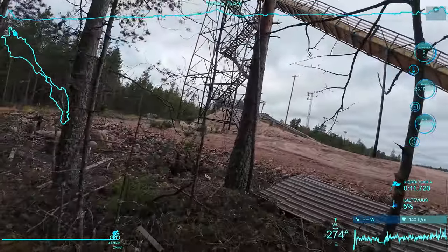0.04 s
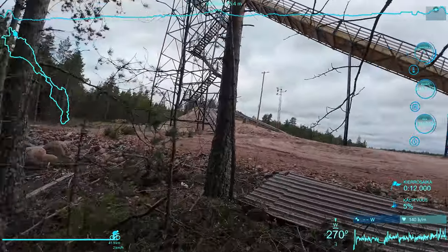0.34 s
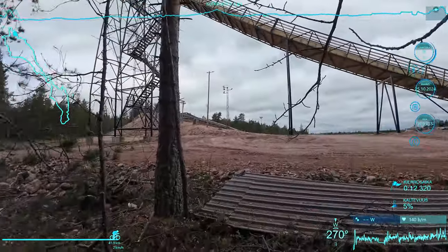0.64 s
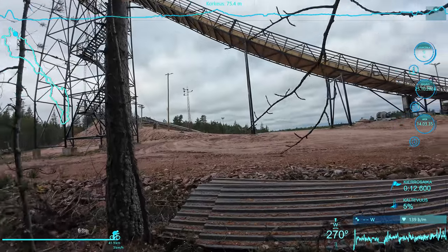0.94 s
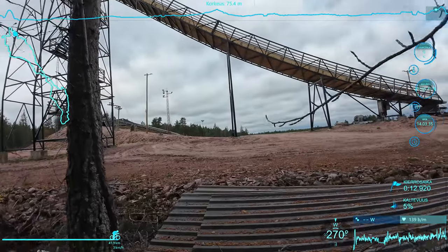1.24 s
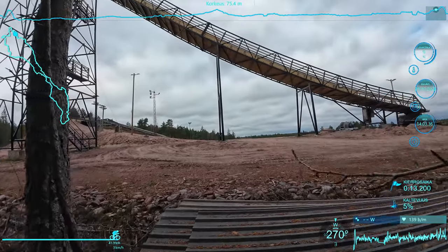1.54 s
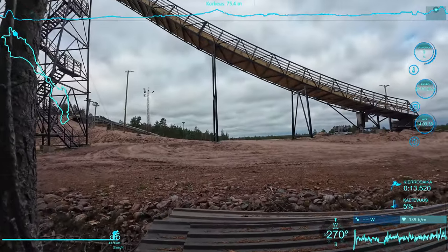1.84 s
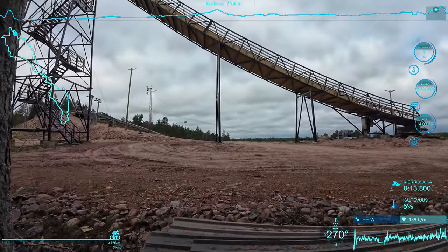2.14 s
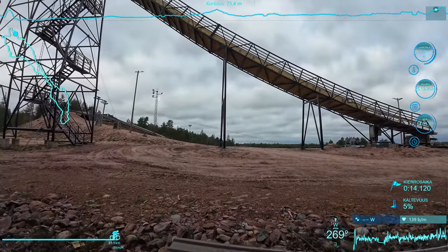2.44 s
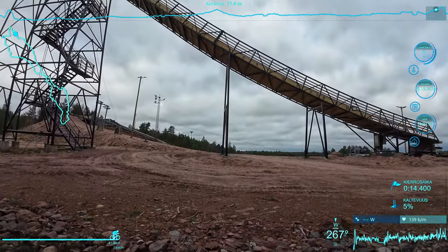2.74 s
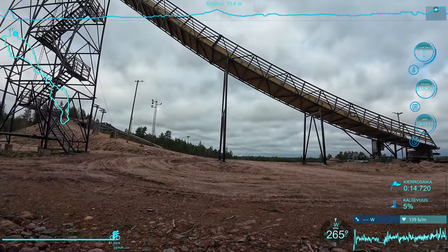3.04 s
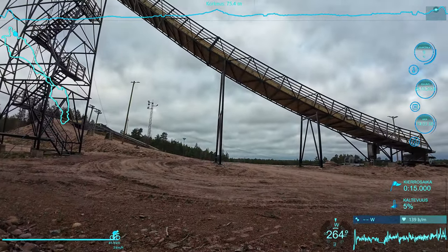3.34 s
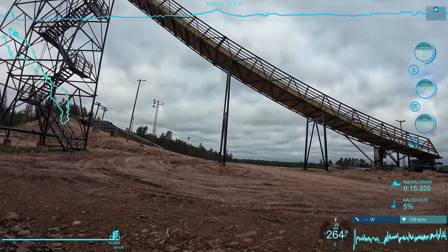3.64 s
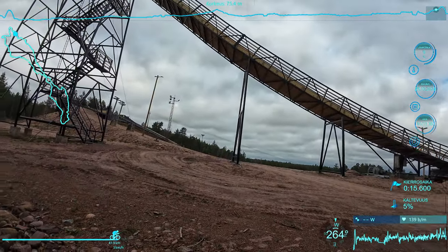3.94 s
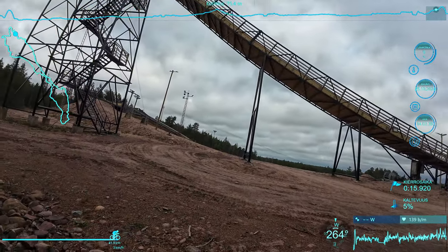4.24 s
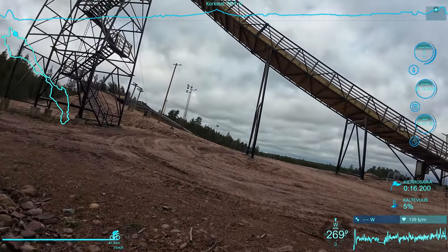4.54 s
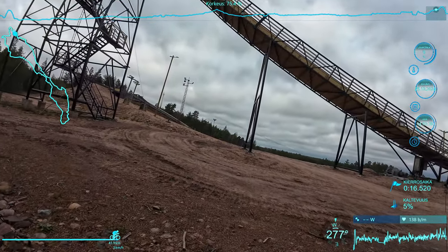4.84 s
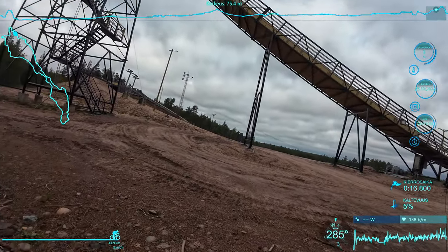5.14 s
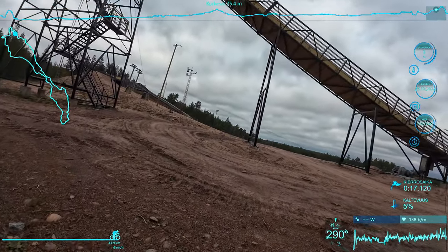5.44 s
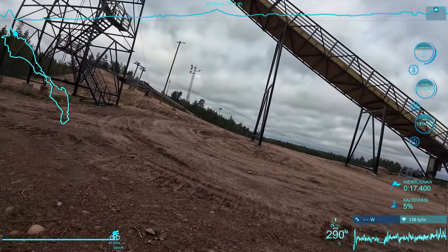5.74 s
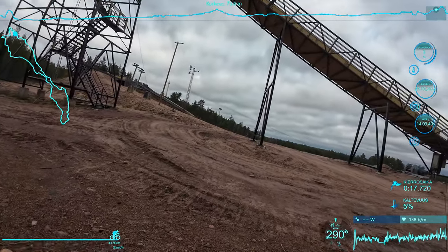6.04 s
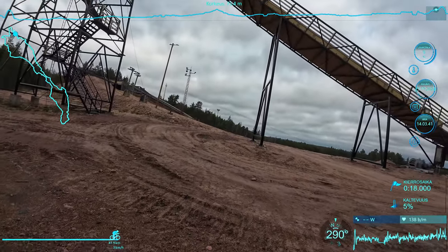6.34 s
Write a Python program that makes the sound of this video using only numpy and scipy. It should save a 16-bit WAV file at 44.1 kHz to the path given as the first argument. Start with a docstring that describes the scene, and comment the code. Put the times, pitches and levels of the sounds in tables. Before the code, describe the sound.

A mountain bike rolls slowly over sandy gravel outdoors, heard close from a microphone riding along, with low wind rumble throughout. For the first 2.5 seconds the tyres crackle and hiss softly, pebbles click, single stones snap away with small pings, and a gust puffs at about 1.3 seconds. At 2.5 seconds a sharp jolt rings the frame, and coarser crunching and chattering loose parts follow until just after 3 seconds. A quieter stretch of grit and stone ticks comes next, with one very faint, brief brake squeak near 3.3 seconds. From 4.4 to 5.2 seconds a quick run of bumps brings rattles, metallic clanks and hollow knocks over louder crunching. Wind buffets harder from about 4.7 seconds, with another hollow knock at 5.5. The gravel keeps crunching, the strongest gusts arrive after 6 seconds, and a stone cracks sharply around 6.3 seconds.

```python
"""A mountain bike rolls slowly onto rough, sandy gravel, heard from a camera that rides along.
Under the tyres the ground crunches and hisses, pebbles clink and single stones snap away.
Bumps make loose parts rattle and the frame ring, and the brake squeaks faintly once.
Wind rumbles and puffs on the camera's two microphone openings."""
import sys
import numpy as np
from scipy import signal
from scipy.fft import rfft, irfft, next_fast_len
from scipy.io import wavfile
from scipy.ndimage import uniform_filter1d, map_coordinates

SR = 44100
rng = np.random.default_rng(int(sys.argv[2]) if len(sys.argv) > 2 else 0)


def materialize(psi):
    """Save the field psi as 16-bit PCM at rate SR to the path in sys.argv[1].

    A 1-D psi becomes a single channel; in a 2-D psi each row is a channel.
    """
    bounded = np.clip(np.atleast_2d(psi).T, -1, 1)
    quanta = np.round(bounded * 32767).astype(np.int16)
    wavfile.write(sys.argv[1], SR, quanta)


N = 281659

# The ground under the tyres, rocky from 2.5 s and 4.5 s: t/s, crunch/dB, grit/dB, sand hiss/dB
GROUND = [(0.0, -55.5, -58, -70.5), (0.168, -58.5, -55, -60.5), (0.3, -50, -54, -58),
          (0.53, -50, -58.5, -64), (0.66, -56.5, -53.5, -58.5), (0.8, -49.5, -57, -62),
          (0.86, -53, -55, -61.5), (1.03, -54.5, -59, -66), (1.3, -50.5, -53, -60.5),
          (1.85, -54.5, -56, -65), (1.95, -56, -64.5, -67.5), (2.44, -51.5, -66, -70),
          (2.49, -35, -51.5, -63), (2.66, -40, -60, -89), (2.77, -34, -58, -69), (3.1, -40.5, -51.5, -61),
          (3.2, -50.5, -60, -73), (3.33, -55, -64.5, -79), (3.5, -50, -55, -65), (3.62, -54.5, -62.5, -71),
          (3.9, -54, -56.5, -65.5), (4.18, -51.5, -51, -67), (4.29, -56.5, -58, -73), (4.41, -51, -59, -67),
          (4.47, -40.5, -52.5, -76), (5.12, -32.5, -49, -63), (5.24, -43.5, -56, -67),
          (5.6, -46.5, -58.5, -76), (5.97, -38.5, -47.5, -57.5), (6.39, -39.5, -45.5, -61.5)]
# The tread scrubs through loose patches: t/s, grit level/dB, half length/s
SCRUBS = [(0.23, -53.5, 0.066), (0.39, -54.5, 0.14), (0.655, -54, 0.027), (0.79, -53.5, 0.045),
          (2.03, -51.5, 0.043), (2.18, -51, 0.082), (2.32, -55.5, 0.051), (2.71, -49, 0.14),
          (3.448, -49.5, 0.038), (3.99, -55, 0.013), (4.43, -50, 0.059), (4.89, -47, 0.087),
          (5.05, -42.5, 0.011), (5.68, -50.5, 0.072)]
# The tone of coarse gravel, fine grit, sand and a hard hit: f/Hz, level/dB
CRUNCH_TONE = [(60, 0.5), (150, 3.5), (330, 2), (700, -1.5), (1150, -5.5), (1800, -13), (2600, -21),
               (5000, -60), (12000, -79)]
GRIT_TONE = [(300, -61.5), (1000, 9.5), (2000, 3.5), (3200, 3), (4600, -0.5), (5800, -5), (7200, -12),
             (15000, -28.5)]
SAND_TONE = [(1500, -25), (4500, -12), (6200, 1), (7100, -7), (8100, 3), (9000, -2), (10200, 2),
             (11800, -4.5), (13300, 3.5), (14500, -6), (16000, -9)]
HIT_TONE = [(100, 1), (400, 4), (1400, -3.5), (3400, -11), (5700, -18), (7000, -23), (8200, -21),
            (11800, -24.5), (13300, -20), (16000, -31)]
# Heaps of pebbles that shift, and at 2.852 s a low rumble of the frame over rocky ground: t/s, level/dB, half
# length/s, typical f/Hz, number of clinks
PEBBLE_HEAPS = [(1.349, -58, 0.089, 3000, 14), (1.77, -57.5, 0.067, 3300, 16),
                (2.483, -38.5, .014, 3310, 30), (2.654, -48, 0.047, 1070, 60),
                (2.783, -50, 0.023, 2650, 30), (2.852, -46.5, 0.29, 291, 70), (2.976, -72, 0.13, 2950, 70),
                (3.417, -48, .007, 2020, 16), (3.45, -45, 0.0092, 1700, 22), (3.769, -45, .012, 1420, 14),
                (3.885, -47.5, 0.03, 1095, 20), (3.99, -52, 0.018, 1580, 14), (4.179, -48, 0.029, 1400, 24),
                (4.264, -42.5, 0.0058, 1500, 12), (4.481, -28, 0.014, 802, 20), (5.33, -40, 0.037, 860, 40),
                (5.499, -42, 0.011, 2280, 16), (5.681, -49, 0.059, 4480, 80),
                (5.72, -34.5, 0.013, 2320, 24), (6.019, -38.5, .1, 780, 260),
                (6.077, -48.5, 0.14, 1600, 500), (6.348, -22, 0.0058, 2440, 20)]
# Stones that snap away: t/s, crack/dB, brightness/dB per band, ping f/Hz, ping/dB, fade/s
# (A fade is the time a sound takes to drop by 60 dB.)
STONE_SNAPS = [(0.21, -44, 1, 2700, -42, 0.05), (0.224, -39, 1, 2480, -41, 0.037),
               (0.3211, -34.5, 7, 4300, -34, 0.01), (0.782, -53, 19, 5200, -59, .03),
               (1.171, -52, -17, 1370, -34.5, .02), (1.259, -47, -5, 3000, -49, .02),
               (1.36, -45, 5, 3630, -42, .04), (1.475, -38.5, 1, 3360, -39, 0.04),
               (1.542, -33, 5, 2460, -25, 0.03), (1.564, -44, 5, 2550, -35, 0.034),
               (1.625, -42.5, 2, 2360, -37.5, 0.031), (1.706, -40.5, 2, 2670, -38, .035),
               (1.719, -43, -1, 3200, -44, .025), (1.758, -52, 4, 3140, -44, .025),
               (1.814, -54, 1, 2950, -49, 0.023), (1.859, -37.5, -1, 2370, -41, 0.059),
               (1.887, -47, 4, 3520, -45, 0.026), (1.96, -43.5, 3, 1980, -48, 0.016),
               (2.118, -44, 12, 4860, -43, .035), (2.156, -45, 16, 4140, -51, 0.052),
               (2.344, -37.5, -3, 2690, -54, 0.041), (2.713, -31, 16.5, 5540, -25.5, .035),
               (2.7426, -27, 9, 4220, -31, 0.041), (2.767, -37.5, 15, 9400, -35, .035),
               (2.875, -38.5, 9, 6460, -48, .02), (3.261, -55, 12, 10300, -53, 0.033),
               (3.527, -51, 20, 9100, -45, .025), (3.574, -47, -7, 3900, -52, 0.011),
               (3.663, -52.5, -19.5, 1600, -42, .012), (3.711, -50, 13.5, 2630, -54, .015),
               (3.721, -54, 13, 4500, -56, .02), (3.846, -54, 12, 5200, -56, .012),
               (3.917, -56, 18, 9050, -50, 0.018), (4.06, -44, 10, 3530, -47, 0.033),
               (4.146, -45, -1, 1690, -39, 0.016), (4.17, -46, 7, 2200, -49, .02),
               (4.208, -38, 0, 2290, -38.5, .03), (4.255, -39, -4, 1490, -39, 0.032),
               (4.399, -40, 10.5, 1930, -39, .03), (4.48, -37, 16, 3470, -38, .03),
               (4.69, -54, 8, 4500, -56, 0.016), (5.543, -38, 2, 1780, -43, .035),
               (5.568, -47, 4, 4470, -45, 0.022), (6.3344, -29, -10, 1750, -38, 0.0099),
               (6.3405, -39, -9, 2300, -41, 0.011), (6.349, -22.5, -12, 2850, -16.5, 0.0044)]
# The body, crack and splinter bands of an average stone: level/dB each
STONE_BANDS_DB = [-9.5, -3.5, -15.5]
# The notes in a stone's ping: pitch multiplier, level/dB, fade multiplier
STONE_NOTES = [(.75, -7.5, 0.97), (1.001, -6.5, 1.43), (1.6, -4, 0.44), (2.03, -13, 1)]
# Pitches at which the bike likes to ring: f/Hz, width/Hz, level/dB
BIKE_RESONANCES = [(173, 11, -4), (305, 72, -4), (490, 3.1, -1), (670, 72, -14), (848, 160, -9),
                   (1360, 230, -7.5), (1640, 140, -2), (1820, 23, 3.5), (2940, 20, 7), (3660, 490, 10.5),
                   (4430, 500, 5), (6140, 220, 0.5)]
# Bumps: t/s, clatter/dB, thud over clatter/dB, brightness/dB per treble band, ring f/Hz, fade/s
BUMPS = [(2.155, -36.5, 3.5, -0.5, 1440, 0.015), (2.47, -29, 5.5, -1.5, 500, 0.04),
         (2.712, -44, 11, 1, 470, 0.12), (2.747, -35, 7.5, -14, 825, 0.22),
         (2.765, -31.5, -9, 0.5, 696, 0.088), (2.887, -41.5, 2, -5, 1100, 0.21),
         (2.926, -44.5, 11, 1, 840, 0.021), (2.955, -36.5, 2, 0.5, 1050, 0.029),
         (3.097, -38.5, 4, -1, 1210, 0.038), (3.526, -51, 3, 3.5, 710, 0.035),
         (4.376, -35, -6, -2, 1690, 0.023), (4.45, -32.5, -6.5, 0, 890, 0.36),
         (4.524, -40.5, 13.5, -11, 625, 0.012), (4.575, -35, -14, 3.5, 776, 0.013),
         (4.612, -31, -5, -1, 2680, 0.0056), (4.809, -30.5, 1, 0.5, 1050, 0.083),
         (4.835, -33, 9.5, -13, 1040, 0.026), (4.864, -30, 0, 1, 1090, 0.033),
         (4.88, -38, 15, 2.5, 614, 0.028), (4.911, -35, -3, 1.5, 625, 0.029),
         (4.968, -35.5, 14.5, 1, 644, 0.027), (5.017, -41, 15.5, 0.5, 610, 0.073),
         (5.032, -37.5, 12, -3, 760, 0.035), (5.092, -30, -2, -9, 1720, 0.036),
         (5.133, -26.5, 3.5, -5.5, 894, 0.057), (5.227, -45, 5, -1, 580, 0.029),
         (5.369, -40, -8, -0.5, 674, 0.055), (5.431, -39.5, 9, -7, 683, 0.088),
         (5.712, -31, -4.5, -3.5, 1510, 0.08), (6.266, -31.5, -6, -3, 950, 0.051)]
# Hard jolts to the frame: t/s, level/dB, fade multiplier, treble tilt/dB per octave
JOLTS = [(2.4719, -12.5, 0.69, 0), (2.768, -29, 0.6, 9), (2.903, -33, 0.51, -5), (2.956, -28, 0.34, -1),
         (4.5269, -14.5, 0.18, 0), (4.878, -30, 0.74, 3), (4.933, -27, 0.54, -5.5), (4.975, -25, 0.38, 0),
         (5.02, -30, 0.37, -2), (5.036, -27, 0.53, -4), (5.094, -29, 1, 1), (5.137, -26.5, 0.51, 4)]
# The notes of the frame and of the metal parts: f/Hz, level/dB, fade/s
FRAME_NOTES = [(181.4, -7, 0.29), (287, -0.5, 0.069), (495, -11.5, 0.086), (606, -10, 0.11),
               (915, -34, 0.089), (1340, -14, 0.065), (1650, -22, 0.05)]
METAL_NOTES = [(980, -9.5, 0.3), (1148, -4.5, 0.057), (1330, -26, 0.16), (1700, -12.5, 0.17),
               (2260, -6, 0.025), (2760, -5.5, 0.054), (2840, -8, 0.08), (3110, -16, 0.12),
               (3440, -9, 0.11), (4250, -7, 0.041), (4570, -6, 0.029), (5620, -5.5, 0.077),
               (7210, -4, 0.068)]
# Blows to the metal parts: t/s, level/dB, centre f/Hz
CLANKS = [(2.471, -28, 3430), (4.379, -36, 2800), (4.453, -19.5, 1670), (4.451, -23, 940),
          (4.454, -22, 4500), (4.459, -27.5, 3480), (4.575, -20, 2140), (4.614, -19, 2790),
          (4.633, -26, 1130), (4.812, -20, 2120), (4.839, -21.5, 1100), (4.864, -20.5, 1140),
          (5.093, -23, 1140), (5.138, -36, 1330), (5.714, -38, 2820)]
# Low, hollow knocks: t/s, level/dB, f/Hz, fade/s
HOLLOW_KNOCKS = [(.318, -29, 326, 0.056), (.422, -31.5, 299, 0.1), (1.727, -41.5, 306, 0.31),
                 (1.928, -35, 310, 0.056), (2.226, -30, 280, 0.1), (4.05, -32.5, 287, 0.23),
                 (4.886, -17, 265, 0.12), (4.932, -16, 285, 0.066), (5.526, -13.5, 298, 0.031),
                 (5.776, -28, 315, 0.074), (5.827, -28, 295, 0.064), (6.372, -19, 310, .08)]
# Steady air flowing over the microphone: t/s, rumble/dB
BREEZE = [(0.0, -49), (0.2, -51), (0.72, -59), (1.6, -41.5), (1.9, -40), (2.02, -42), (2.15, -44),
          (2.4, -46.5), (3.23, -50), (3.38, -48), (3.56, -44), (3.7, -45), (4.12, -48.5), (4.27, -66),
          (4.42, -40), (5.3, -49), (5.66, -33.5), (6.02, -39), (6.39, -31)]
# Gusts: t/s, rumble/dB, buffeting/dB, half length/s
GUSTS = [(0.07, -44, -64, 0.045), (0.355, -28.5, -44, 0.039), (0.543, -38, -41, 0.12),
         (0.906, -29.5, -38.5, 0.14), (1.085, -30, -46, 0.069), (1.325, -17, -33.5, 0.12),
         (1.766, -36, -64, 0.067), (2.172, -32.5, -38.5, 0.081), (2.323, -32, -58, 0.038),
         (2.513, -30, -49, 0.038), (2.645, -24, -38.5, 0.066), (2.765, -23, -35, 0.068),
         (2.944, -24, -34.5, 0.073), (3.102, -27, -42.5, 0.072), (3.856, -31.5, -71, 0.08),
         (4.406, -38, -62, 0.041), (4.568, -25, -32, 0.049), (4.768, -14.5, -28, 0.048),
         (4.871, -14, -27, 0.075), (5.01, -21, -30.5, 0.041), (5.152, -23.5, -40, 0.06),
         (5.428, -34, -33, 0.016), (5.535, -13.5, -27, 0.051), (5.815, -14.5, -34.5, 0.053),
         (5.923, -26.5, -44, 0.16), (6.11, -17.5, -28, 0.06), (6.232, -6.5, -34, 0.014),
         (6.311, -11.5, -27, 0.07)]
# The tone of buffeting air: f/Hz, level/dB
BUFFET_TONE = [(25, -31.5), (46, 12), (75, 2.5), (150, -3), (320, -15.5), (470, -29), (1200, -113),
               (4000, -120)]
# Single swirls of air that hit the microphone: t/s, level/dB, f/Hz
PUFFS = [(0.293, -26.5, 185), (0.416, -33, 182), (0.546, -41.5, 151), (0.799, -23, 112), (0.838, -26, 86),
         (0.883, -24, 81.4), (0.965, -18, 76), (0.987, -24.5, 144), (1.186, -28, 190), (1.244, -29, 140),
         (1.326, -19.5, 89), (2.221, -30, 171), (4.049, -30, 151), (4.718, -22.5, 103), (5.518, -27, 65.5),
         (6.219, -16, 65)]
# How alike the two microphone openings sound: f/Hz, likeness (1 = the same)
MIC_LIKENESS = [(60, 0.21), (200, 0.95), (600, 0.99), (1400, 0.98), (3100, 0.86), (5500, 0.63),
                (8000, 0.43), (15000, 0.25)]
# How much louder the left opening is: f/Hz, level/dB
MIC_BALANCE = [(100, -1), (1500, 0.4), (2300, 0.5), (3000, 2), (3700, 3.5), (4500, 3.5), (5700, 3),
               (6500, -1), (8200, 1.5), (9700, -3.5), (12800, -1), (14500, -4)]
# How far the left opening's wave runs ahead: f/Hz, phase/rad
MIC_LEAD = [(1500, 0), (3000, .1), (6500, .4), (8500, .9), (10400, 1.9), (13000, 2.7), (16000, 3.3)]


def tyres():
    """Gravel crunches through the bike; grit crackles, pebbles tick and sand hisses under the tread."""
    scrub = swells(SCRUBS, squareness=2.5)
    crunch_db, grit_db, sand_db = curves(GROUND)
    crunch_db = with_swells(crunch_db, amp(1.5) * scrub)
    grit_db = with_swells(grit_db, scrub)
    sand_db = with_swells(sand_db, amp(-7.5) * scrub)
    load = wobble(45)  # the tread presses unevenly on the loose ground
    softness = amp(-.3 * (crunch_db + 54))  # quiet ground is fine sand, loud ground is coarse stones
    gravel = grains(per_s=240, spread_db=4.5, life_s=0.0047, smooth=0.58 * softness)
    crunch = coloured(through_bike(gravel), CRUNCH_TONE)
    grit = coloured(grains(per_s=210, spread_db=1.5, life_s=0.0014, smooth=1.73), GRIT_TONE)
    sand = coloured(grains(per_s=140, spread_db=4.2, life_s=0.00086, smooth=1.3), SAND_TONE)
    return (amp(crunch_db + 1.4 * load) * crunch
            + amp(grit_db + 1.9 * load) * grit
            + amp(grit_db) * pebble_ticks()
            + amp(sand_db + 1.2 * load) * sand)


def grains(per_s, spread_db, life_s, smooth):
    """Many tiny grains of uneven size crumble briefly, over a bed of smooth noise."""
    sizes = amp(spread_db * np.minimum(rng.exponential(size=N), 3.3))
    breaks = rng.random(N) < per_s / SR
    power = signal.lfilter([1], [1, -np.exp(-1 / (life_s * SR))], (sizes * breaks) ** 2)
    return np.sqrt(power / power.mean() + smooth ** 2) * rng.standard_normal((2, N))


def pebble_ticks(per_s=42, typical_hz=2308, spread_octaves=0.544, ring_cycles=4):
    """Single pebbles click together at random, each with two short notes."""
    out, t = np.zeros((2, N)), np.arange(SR // 60) / SR
    for when, pitch, weakness, upper, phase in rng.random((round(per_s * N / SR), 5)):
        hz = typical_hz * 2 ** (spread_octaves * np.sqrt(12) * (pitch - .5))
        ear_phase = np.array([[0], [np.pi * phase]])
        tick = sum(gain * np.exp(-f * t / ring_cycles) * np.sin(2 * np.pi * f * t + ear_phase)
                   for f, gain in [(hz, 1), (hz * (1.3 + upper), .5)])
        add(out, when * N / SR, amp(14.5 - 10 * weakness) * tick)
    return out


def pebble_heaps(spread_octaves=0.386, spread_db=4.5, ring_cycles=8):
    """A heap gives way under the tread: many tiny clinks, each with its own pitch and strength. The low row at
    2.852 s is instead the frame rumbling over rocky ground."""
    out, t = np.zeros((2, N)), np.arange(SR // 40) / SR
    for s, db, half_s, typical_hz, count in PEBBLE_HEAPS:
        when, pitch, size, phase = rng.standard_normal((int(count), 4)).T
        hz = typical_hz * 2 ** (spread_octaves * pitch[:, None])
        fade = amp(spread_db * size[:, None]) * np.exp(-hz * t / ring_cycles)
        angle = 2 * np.pi * hz * t
        clinks = fade * np.array([np.sin(angle), np.sin(angle + np.pi * phase[:, None])])
        clinks *= amp(db) * np.sqrt(half_s * SR / np.sum(clinks[0] ** 2))  # level of the whole heap
        for k, offset_s in enumerate(when * half_s / 2):
            add(out, s + offset_s, clinks[:, k])
    return out


def stone_snaps(click_db=20, smear=.07):
    """A pinched stone lets go with a sharp crack, a rough ping and a brief skitter."""
    out, t = np.zeros((2, N)), np.arange(SR // 10) / SR
    for s, db, bright_db, hz, ping_db, fade_s in STONE_SNAPS:
        snap, skitter = np.exp(-t / 0.00068), amp(-60 * t / fade_s)
        noise = (snap + skitter) * rng.standard_normal((2, len(t)))
        noise[0, 0] += amp(click_db)  # the first instant of the crack
        levels_db = db + np.array(STONE_BANDS_DB) + bright_db * np.array([-1, 0, 1])
        crack = set_bands(coloured(noise, HIT_TONE), [800, 2400, 5600, 16000], levels_db)
        ping = 0
        for ratio, note_db, fade_scale in STONE_NOTES:
            # the tread and the ground smear each note's pitch
            jitter = uniform_filter1d(rng.standard_normal((2, len(t))), size=24)
            drift = np.cumsum(jitter, axis=1) * np.sqrt(2 * np.pi * smear * ratio * hz / SR)
            fade = amp(note_db - 60 * t / (fade_scale * fade_s))
            ping += fade * np.sin(2 * np.pi * ratio * hz * t + drift)
        add(out, s + 0.00056, crack + amp(ping_db) * ping)
    return out


def rattles(rise_s=0.0016, jingle_db=-8, sizzle_db=-15):
    """Each bump sets loose parts chattering: a quick blow, then a weaker rattle."""
    out, t = np.zeros((2, N)), np.arange(SR // 4) / SR
    for s, db, thud_db, bright_db, hz, fade_s in BUMPS:
        blow, rattle = amp(-60 * t / fade_s), amp(-16 - 60 * t / .22)
        shape = (1 - np.exp(-t / rise_s)) * (blow + rattle)
        chatter = through_bike(coloured(shape * rng.standard_normal((2, len(t))), HIT_TONE))
        # the struck part adds a ring of its own
        chatter = filtered(chatter, lambda f: 1 + resonance(f, hz, width_hz=hz / 12.6, db=1))
        levels_db = db + np.array([thud_db, 0, jingle_db + bright_db, sizzle_db + 2 * bright_db])
        add(out, s, set_bands(chatter, [130, 800, 2400, 6000, 16000], levels_db))
    return out


def through_bike(x):
    """A hit is heard both directly and through the ringing parts of the bike."""
    return filtered(x, lambda f: 1 + sum(resonance(f, *row) for row in BIKE_RESONANCES))


def frame_jolts(pivot_hz=450):
    """A hard jolt rings all the frame's notes at once; its tilt favours the high or the low ones."""
    out, t = np.zeros((2, N)), np.arange(SR // 4) / SR
    for s, db, fade_scale, tilt_db in JOLTS:
        ring = 0
        for hz, note_db, fade_s in FRAME_NOTES:
            strength_db = note_db + tilt_db * np.log2(hz / pivot_hz) + rng.normal(0, 1.5)
            ring += amp(strength_db - 60 * t / (fade_s * fade_scale)) * np.sin(2 * np.pi * hz * t)
        add(out, s, amp(db) * ring)
    return out


def hollow_knocks(rise_s=0.0023):
    """Puffs of wind ring a hollow part close to the microphone."""
    out, t = np.zeros((2, N)), np.arange(SR // 3) / SR
    for s, db, hz, fade_s in HOLLOW_KNOCKS:
        shape = amp(db - 60 * t / fade_s) * (1 - np.exp(-t / rise_s))
        add(out, s, shape * np.sin(2 * np.pi * hz * t))
    return out


def metal_clanks(rise_s=0.00038):
    """Each blow rings the metal notes that lie near its own pitch."""
    out, t = np.zeros((2, N)), np.arange(SR // 4) / SR
    for s, db, centre_hz in CLANKS:
        ring = 0
        for hz, note_db, fade_s in METAL_NOTES:
            strength_db = note_db - 22 * abs(np.log2(hz / centre_hz)) + rng.normal(0, 2)
            note = np.sin(2 * np.pi * (hz * t + rng.random((2, 1))))
            ring += amp(strength_db - 60 * t / fade_s) * note
        add(out, s, amp(db) * (1 - np.exp(-t / rise_s)) * ring)
    return out


def brake_squeak(at_s=3.32, db=-65, hz=3822, half_s=0.028):
    """The brake disc brushes its pad with one faint, wavering squeak."""
    t = np.arange(N) / SR
    shape = amp(db) * np.exp(-((t - at_s) / half_s) ** 2)
    return shape * np.sin(2 * np.pi * hz * t + 0.81 * wobble(250))


def wind(rumble_hz=29.8, squareness=1.71, stereo_below_hz=110):
    """Air swirls at each microphone opening: a deep rumble, lumpy buffeting and single puffs."""
    breeze_db = curves(BREEZE)[0] + 3.5 * wobble(14)
    rumble_gusts = swells([(s, db, half_s) for s, db, _, half_s in GUSTS], squareness)
    buffet_gusts = swells([(s, db, half_s) for s, _, db, half_s in GUSTS], squareness)
    phase = 2 * np.pi * np.cumsum(rumble_hz + 4 * wobble(25)) / SR
    rumble_db = with_swells(breeze_db, rumble_gusts) - .5 + 2.2 * wobble(22)
    rumble = np.sqrt(2) * np.array([np.sin(phase), np.cos(phase + wobble(3))])
    buffet_db = with_swells(breeze_db - 13, buffet_gusts)
    buffet = unit(amp(0.43 * wobble(36)) * coloured(rng.standard_normal((2, N)), BUFFET_TONE))
    air = amp(rumble_db) * rumble + amp(buffet_db) * buffet
    t = np.arange(SR // 6) / SR
    for s, db, hz in PUFFS:
        swirl = t * np.exp(-t / 0.0069) * rng.standard_normal((2, len(t)))
        add(air, s - .004, set_bands(swirl, [hz / 2.27, hz * 1.515], [db - 5]))
    # the openings differ most in the slowest swirls, and the left one faces the wind
    side = filtered(air[0] + 0.75 * air[1], lambda hz: 1 / np.sqrt(1 + (hz / stereo_below_hz) ** 2))
    return np.array([air[0] + side, air[0] - side])


def mic_openings(pair):
    """Two close openings hear much the same low notes; the treble differs in detail, level and timing."""
    sign = np.array([[1], [-1]])  # left, right

    def spread(hz):
        return np.arccos(np.clip(along(MIC_LIKENESS, hz), -1, .999)) / 2

    def response(hz):
        lead = along(MIC_LEAD, hz)
        sum_gain = np.sqrt((1 + np.cos(2 * spread(hz)) * np.cos(lead)) / 2)  # both sides together
        return amp(sign * along(MIC_BALANCE, hz) / 2) * np.exp(1j * sign * lead / 2) / sum_gain

    common, apart = filtered(pair, lambda hz: np.array([np.cos(spread(hz)), np.sin(spread(hz))]))
    return filtered(common + sign * apart, response)


def amp(db):
    """Turn decibels into a gain."""
    return 10 ** (np.asarray(db) / 20)


def unit(x):
    """Scale a sound to an average power of 1."""
    return x / np.sqrt(np.mean(x ** 2) + 1e-20)


def along(points, hz):
    """Read between (f/Hz, value) points, with octaves evenly spaced."""
    f, values = np.transpose(points)
    return np.interp(np.log(hz + 1), np.log(f + 1), values)


def curves(rows):
    """One value per sample for each column after the time."""
    s, *columns = np.transpose(rows)
    return [np.interp(np.arange(N) / SR, s, column) for column in columns]


def wobble(per_s):
    """A smooth curve through per_s random values a second."""
    values = rng.standard_normal(int(N * per_s / SR) + 4)
    return map_coordinates(values, [np.arange(N) * per_s / SR], mode="nearest")


def swells(rows, squareness):
    """Gain of overlapping swells; squareness 2 is a bell shape, more is flatter on top."""
    t = np.arange(N) / SR
    return np.sqrt(sum(amp(db) ** 2 * np.exp(-2 * np.minimum(abs((t - s) / half_s), 6) ** squareness)
                       for s, db, half_s in rows))


def with_swells(level_db, gain):
    """Level in dB of a steady sound with swells on top."""
    return 20 * np.log10(np.hypot(amp(level_db), gain))


def resonance(f, hz, width_hz, db):
    """How a part that rings at hz answers a push at frequency f."""
    return amp(db) * 1j * f * width_hz / (hz * hz - f * f + 1j * f * width_hz)


def filtered(x, response):
    """Multiply each frequency in x by response(frequency)."""
    n = x.shape[-1]
    padded = 2 * next_fast_len(n * 3 // 4)
    return irfft(rfft(x, padded) * response(np.fft.rfftfreq(padded, 1 / SR)), padded)[..., :n]


def coloured(x, tone):
    """Give x a tone and a power of 1, while clicks keep their sharp starts."""
    def response(hz):
        cepstrum = irfft(np.log(amp(along(tone, hz))))
        half = len(cepstrum) // 2
        # emptying the second half stops any ringing ahead of a click
        return np.exp(rfft(np.r_[cepstrum[0], 2 * cepstrum[1:half], np.zeros(half)]))
    return unit(filtered(x, response))


def set_bands(x, edges_hz, levels_db):
    """Set the level that each band of a short sound reaches in its loudest 4 ms."""
    out = 0
    for low, high, db in zip(edges_hz, edges_hz[1:], levels_db):
        band = signal.sosfilt(signal.butter(4, [low, high], "band", fs=SR, output="sos"), x)
        power = uniform_filter1d(band ** 2, SR // 250).max(axis=-1, keepdims=True)
        out = out + amp(db) * band / np.sqrt(power)
    return out


def add(track, s, sound):
    """Mix a sound in at s seconds."""
    part = track[:, round(s * SR):][:, :sound.shape[-1]]
    part += sound[..., :part.shape[-1]]


def scene():
    """Tyres, stones and the shaking bike reach the microphone while wind blows over it."""
    air = wind()
    ground = tyres() + pebble_heaps() + stone_snaps()
    bike = rattles() + frame_jolts() + hollow_knocks() + metal_clanks() + brake_squeak()
    return mic_openings(ground + bike) + air


def record(dry):
    """The camera makes the bass mono in strong wind, rounds off peaks and cuts the highest treble."""
    bass_hz, windy_db, hold_s = 700, -32.5, 0.15
    ceiling, top_hz = .497, 15850
    t = np.arange(N) / SR
    mid, side = (dry[0] + dry[1]) / 2, (dry[0] - dry[1]) / 2
    bass = lambda hz: 1 / (1 + (hz / bass_hz) ** 4)
    windiness = np.sqrt(abs(uniform_filter1d(filtered(mid, bass) ** 2, SR // 5)))  # the bass level
    windiness = np.maximum(windiness, np.interp(t - hold_s, t, windiness))  # lingers after a gust
    mono_share = 1 - 1 / (1 + (windiness / amp(windy_db)) ** 12)
    side = side - mono_share * filtered(side, bass)
    pair = np.array([mid + side, mid - side])
    rounded = pair / (1 + abs(pair / ceiling) ** 12) ** (1 / 12)
    return filtered(rounded, lambda hz: 1 / (1 + (hz / top_hz) ** 120))


dry = scene()
out = record(dry)
materialize(out)
```